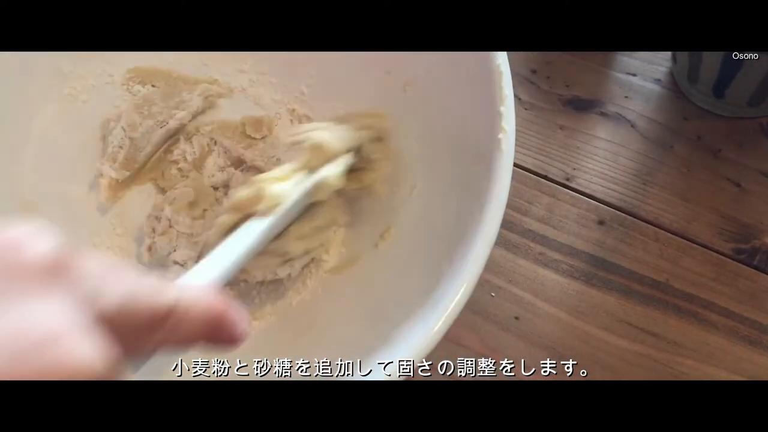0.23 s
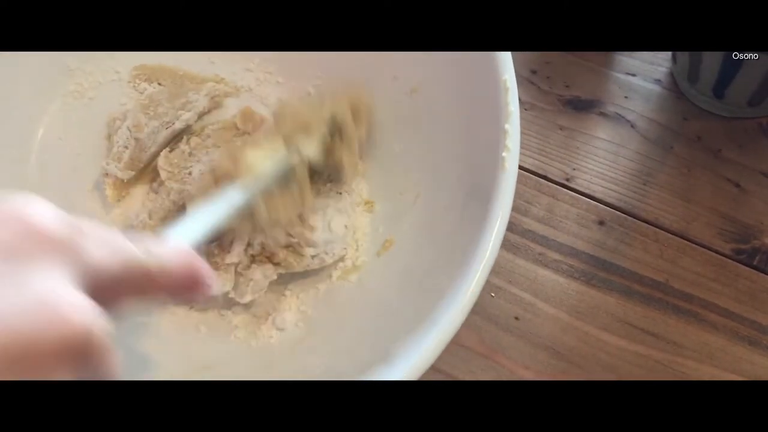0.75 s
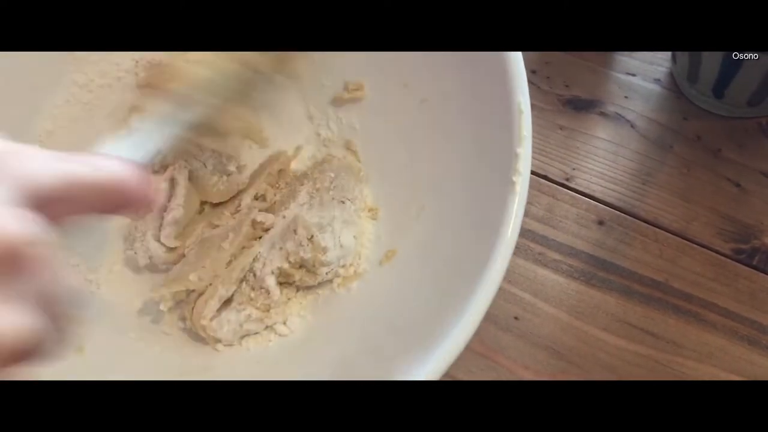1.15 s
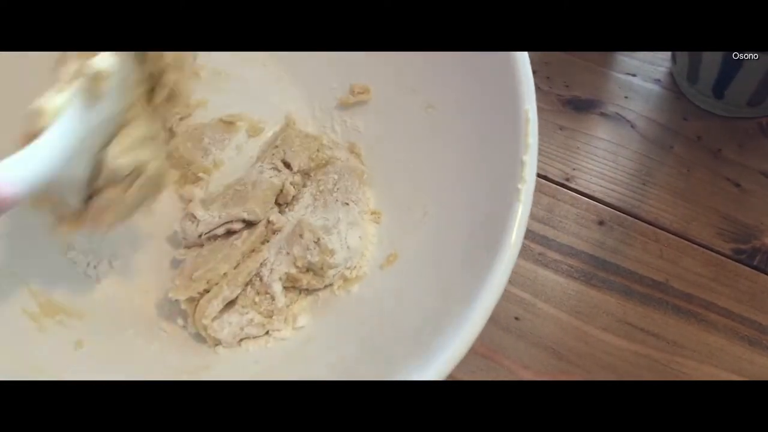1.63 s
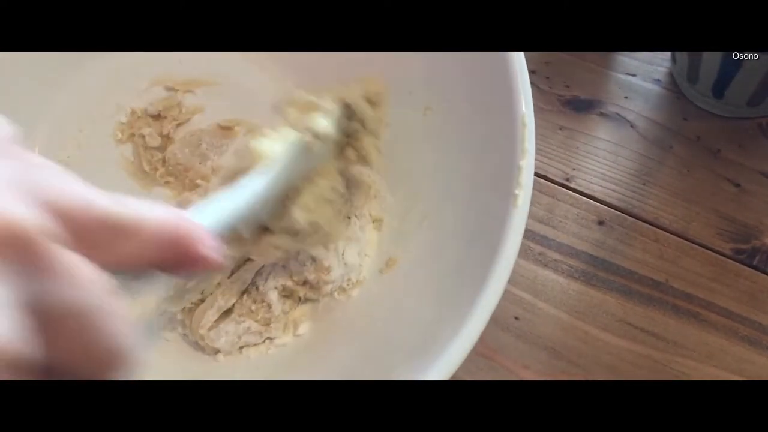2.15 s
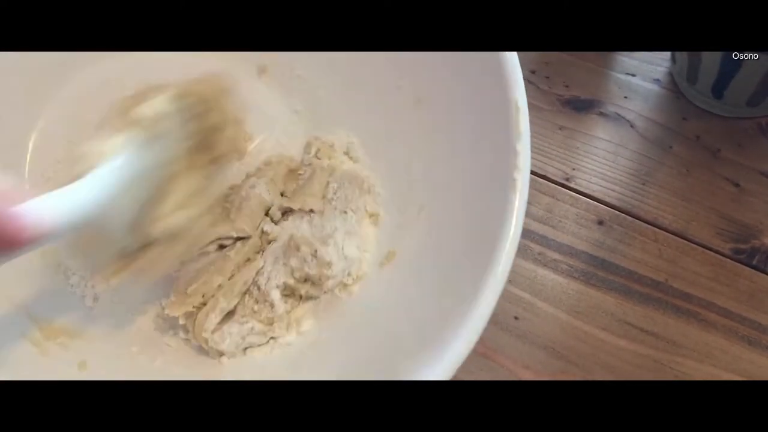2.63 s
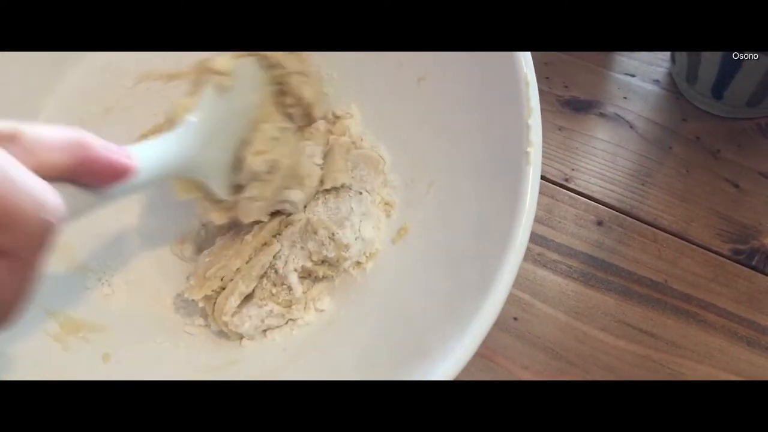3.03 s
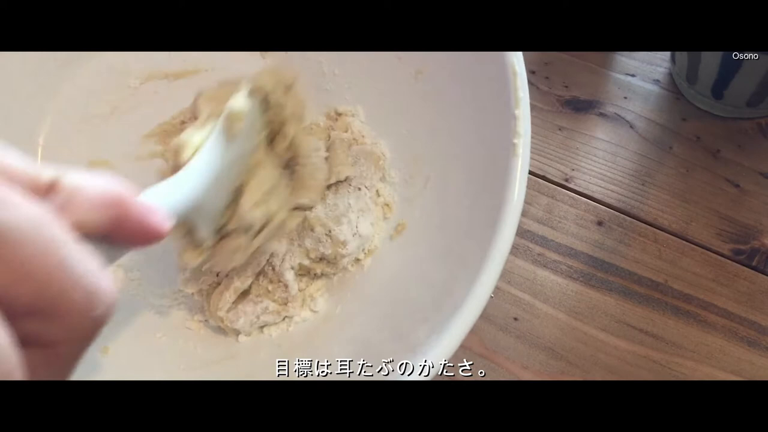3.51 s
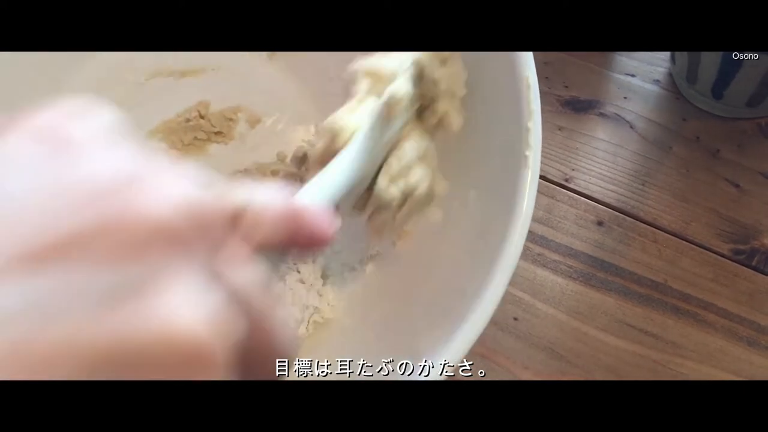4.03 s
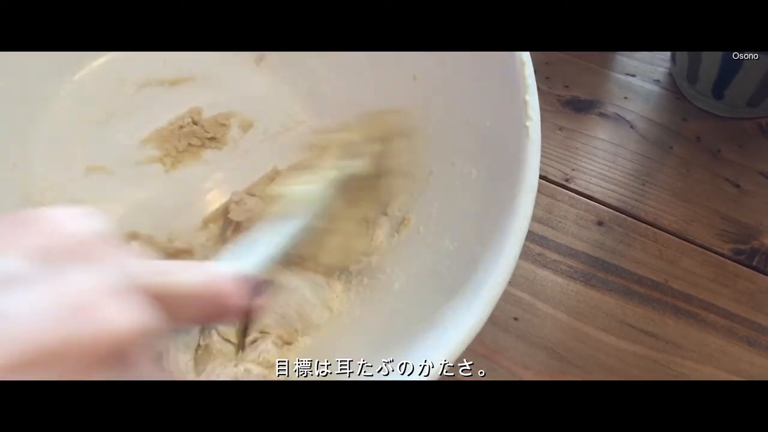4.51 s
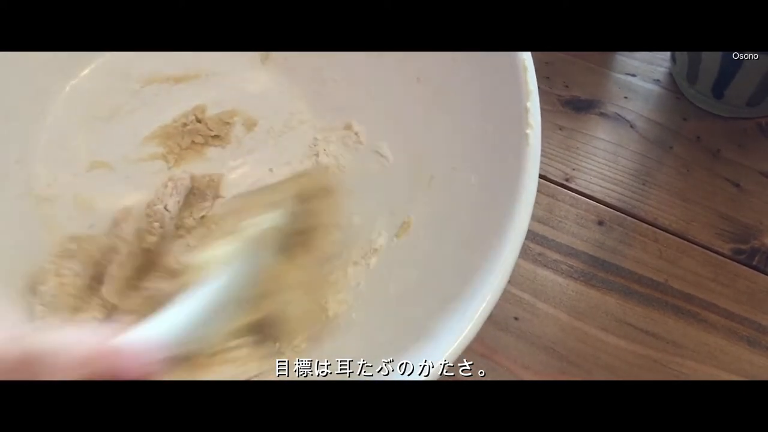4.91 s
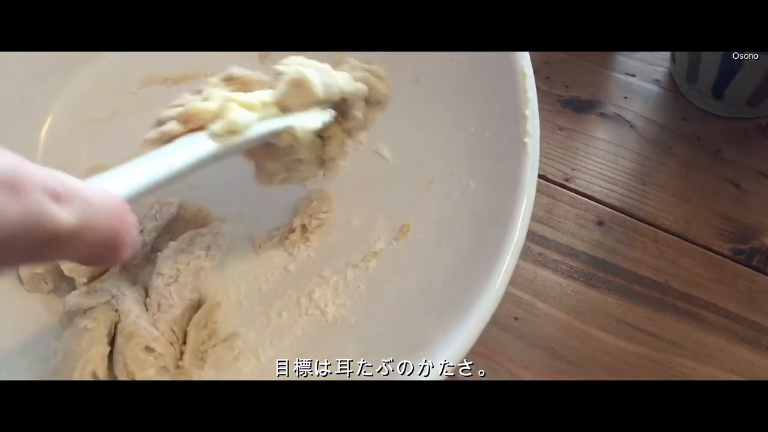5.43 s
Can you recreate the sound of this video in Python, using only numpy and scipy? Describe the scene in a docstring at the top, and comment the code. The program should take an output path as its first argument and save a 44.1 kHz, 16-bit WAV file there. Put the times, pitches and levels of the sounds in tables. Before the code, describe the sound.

Close to the microphone in a kitchen, stiff dough is pressed and smeared around a bowl with a silicone spatula. Soft scrapes and sticky smacks come in quick, irregular strokes, with low thuds as the bowl shifts on a wooden table. An air pocket snaps, the blade knocks the side several times and squeaks twice, the second time faintly. The strongest push comes late, followed by a hissing swipe and a small tap.

```python
"""In a kitchen, close by, a silicone spatula folds stiff dough in a bowl on a wooden table.
Sliding friction makes the blade hiss and rub hollowly on the wall; the sticky dough tears and squishes.
Each push rocks the bowl with a dull thud; knocks and chatter of the blade excite its damped modes.
Air pockets snap, the spatula ticks and taps, and twice stick-slip motion makes the blade squeak."""
import sys
import numpy as np
from scipy import signal
from scipy.fft import rfft, irfft, next_fast_len
from scipy.io import wavfile
from scipy.ndimage import map_coordinates

SR = 44100
rng = np.random.default_rng(int(sys.argv[2]) if len(sys.argv) > 2 else 0)


def put_to_file(sound):
    """Save the sound as 16-bit audio at rate SR, in the file named by the first command-line argument."""
    columns = np.atleast_2d(sound).T  # one column per channel
    safe = np.clip(columns, -1, 1)
    whole_steps = np.round(safe * 32767)
    wavfile.write(sys.argv[1], SR, whole_steps.astype(np.int16))


N = 249606

# Levels are relative within each table. Spectra: f/Hz, level/dB
ROOM_SPECTRUM = [(20, -27), (40, -6.5), (65, 1), (100, -7), (160, -7), (240, -9.5), (400, -18), (800, -21),
                 (1600, -24), (3000, -27.5), (8000, -32.5), (15500, -37.5)]
TABLE_SPECTRUM = [(20, -60), (40, -10), (60, -15), (88, 5), (120, -5), (155, 4), (250, -14.5), (400, -25.5),
                  (900, -52.5)]
SQUASH_SPECTRUM = [(100, 0.5), (180, -3), (290, 1), (400, -4), (520, -1.5), (700, -7.5), (1100, -24),
                   (2000, -21), (4000, -68)]
RUB_SPECTRUM = [(200, -6.5), (450, 2), (1100, 7), (1900, 1), (2600, -0.5), (4300, 5.5)]
SMEAR_SPECTRUM = [(500, -38), (1000, -20.5), (1700, -7.5), (2400, -0.5), (3300, -4), (4400, -1.5),
                  (4900, -12.5), (6500, -2.5), (10000, -44)]
HISS_SPECTRUM = [(2000, -29), (5000, -17), (6000, -15.5), (6500, -6), (7300, -2), (8900, -1.5), (10300, -9),
                 (11200, -7), (13000, -9), (15800, -10.5)]
# reverberation of the kitchen: f/Hz, T60/s
ROOM_DECAY = [(100, 0.48), (500, 0.2), (2000, 0.083), (10000, 0.11)]
# modes of the dough-damped bowl: f/Hz, level/dB, T60/s
BOWL_MODES = [(191, -1.5, 0.089), (252, -11, 0.055), (320, -13, 0.04), (469, -1, 0.046), (546, -5.5, 0.042),
              (634, -4, 0.039), (742, -15.5, 0.038), (1039, -16, 0.14), (1131, -14.5, 0.08),
              (1246, -11.5, 0.052), (1786, -16, 0.075), (1747, -3, 0.018), (1932, -3, 0.026),
              (1930, -5.5, 0.039), (2590, -7, 0.022), (2985, -12.5, 0.033), (3470, -18, 0.021),
              (4340, -18.5, 0.018)]
# pushes that rock the bowl: t/s, level/dB, f/Hz, loss per rebound/dB
BOWL_PUSHES = [(0.017, -31, 83.4, 3.5), (0.828, -43.5, 78.4, 22), (1.186, -37, 83, 20),
               (1.211, -40, 76.6, 3), (1.441, -42.5, 91.5, 20), (1.522, -40, 66.5, 4.5),
               (1.905, -40, 69, 10), (1.948, -47, 130, 16), (2.006, -45, 60.7, 21), (2.082, -44, 69, 21),
               (2.222, -46, 61, 20), (2.266, -47.5, 71.6, 20), (2.402, -30.5, 79.6, 3),
               (2.593, -36.5, 66, 25), (2.804, -40.5, 62, 21), (2.844, -40, 126, 20),
               (2.902, -43.5, 94, 1.5), (3.338, -37.5, 69, 23), (3.406, -37.5, 68, 16),
               (3.438, -36.5, 72, 15), (3.719, -40, 67.4, 5.5), (3.824, -42, 76.6, 19),
               (4.187, -42, 99, 25), (4.206, -36, 88, 6.5), (4.545, -41.5, 68.4, 18),
               (4.602, -23.5, 92, 8.5), (4.705, -35, 78.6, 8.5), (4.909, -38.5, 83, 6),
               (5.037, -46, 85, 16), (5.237, -47, 84.5, 15), (5.487, -51, 85, 20)]
# the lump is squashed between blade and wall: t/s, level/dB, T60/s
DOUGH_SQUASHES = [(0, -64, .5), (1.18, -62, 0.7), (1.54, -66.5, 0.54), (2.578, -55, 0.1), (2.99, -62, .35),
                  (4.178, -59, 0.26), (4.535, -61.5, .5), (4.6, -62.5, .3), (4.705, -64, 0.18),
                  (4.94, -57, 0.45)]
# wet squishes and hollow rubs on the bowl: t/s, level/dB, half length/s, f/Hz, half width/octaves
SQUISHES_AND_RUBS = [(0.863, -62.5, 0.0051, 2890, 1), (0.981, -67.5, 0.02, 3370, 0.13),
                     (1.038, -67.5, .014, 2580, .15), (1.217, -70, 0.012, 2010, 0.17),
                     (1.596, -69, 0.0083, 1990, 0.087), (1.179, -59.5, 0.0058, 7550, 0.32),
                     (1.794, -63.5, 0.0061, 7850, 0.38), (1.863, -61, 0.017, 7100, 0.12),
                     (1.913, -52.5, 0.015, 7130, 0.045), (1.976, -57.5, 0.012, 7460, 0.26),
                     (2.099, -58, 0.028, 1600, 0.6), (2.447, -57.5, 0.0053, 7440, 0.059),
                     (2.523, -67, 0.031, 1940, 0.07), (2.598, -64, 0.024, 7000, 0.077),
                     (2.869, -60.5, 0.0027, 6200, .07), (3.33, -65.5, 0.0083, 7600, 0.06),
                     (3.387, -61.5, 0.004, 6740, 0.24), (3.484, -64.5, 0.023, 2010, 0.054),
                     (2.942, -64.5, 0.041, 1870, 0.07), (4.154, -57, 0.004, 7460, 0.31),
                     (4.173, -57, 0.012, 7040, 0.44), (4.272, -70, 0.034, 2740, 0.14),
                     (4.545, -66, 0.013, 6940, 0.13), (4.692, -63.5, 0.025, 3070, 0.05),
                     (5.009, -57.5, 0.036, 3050, 0.3)]
# air pockets snap, the spatula ticks and once taps with three ringing tones:
# t/s, level/dB, f/Hz, cycles per 20 dB of decay
POPS_AND_TAPS = [(1.545, -51, 1870, 7.2), (2.1099, -24.5, 1720, 2.1), (3.567, -43, 2380, 3.6),
                 (4.912, -44, 1180, 0.86), (5.22, -47, 2040, 10.4), (5.2223, -47, 2900, 9.8),
                 (5.222, -45.5, 1320, 2)]
# the blade sticks and slips, one list a squeak: t/s, f/Hz, level/dB
SQUEAK_PATHS = [
    [(3.50, 518.6, -77), (3.522, 547, -54), (3.533, 658, -45.5), (3.537, 555, -61), (3.541, 486, -36),
     (3.55, 509, -46.5), (3.567, 512, -50.5), (3.595, 500, -56), (3.63, 505, -81)],
    [(4.32, 595, -78), (4.333, 558, -59), (4.353, 506, -61.5), (4.375, 505, -78)],
]
# the blade strikes the wall: t/s, level/dB, tilt/(dB per octave), contacts, gap/s
BLADE_KNOCKS = [(1.168, -58.5, 1, 1, 0), (1.857, -49.5, 2, 4, 0.012), (2.383, -29, -1.7, 1, 0),
                (2.4444, -44, 5, 2, 0.0059), (2.8399, -31.5, -7.5, 1, 0), (2.8557, -42, 1, 4, .0056),
                (2.942, -57, -4, 1, 0), (3.123, -56.5, -1, 1, 0), (3.314, -35, -6.5, 1, 0),
                (3.328, -50.5, 4, 2, .006), (4.514, -57.5, 0.5, 1, 0), (4.586, -49.5, -0.5, 1, 0),
                (4.891, -54, 1, 1, 0.005)]
# the bare blade drags on the wall: t/s, half length/s, level/dB
BLADE_DRAGS = [(1.1, 0.27, -72.5), (1.575, 0.049, -65.5), (1.885, 0.036, -64), (2.455, 0.039, -55.5),
               (2.56, 0.037, -60.5), (2.877, 0.012, -52.5), (2.97, 0.061, -62), (3.18, 0.037, -72),
               (3.342, 0.038, -61.5), (3.515, 0.039, -62)]
# swells of blade speed: t/s, half length/s, hiss level/dB, smear level/dB
BLADE_STROKES = [(0.01, 0.016, -69.5, -69.5), (0.169, .026, -71, -73), (0.424, .07, -78.5, -77),
                 (0.558, 0.027, -71, -71), (0.642, 0.012, -61, -73), (0.842, 0.077, -71.5, -71),
                 (0.966, 0.016, -60, -62), (1.042, .024, -64.5, -64), (1.21, 0.056, -69.5, -71.5),
                 (1.331, 0.022, -61.5, -68.5), (1.5, 0.027, -71, -70.5), (1.578, 0.01, -63.5, -74),
                 (1.873, 0.03, -64, -64), (1.917, 0.028, -57, -63.5), (2.013, 0.044, -67, -73),
                 (2.095, 0.025, -50.5, -55), (2.518, 0.039, -64, -68), (2.595, 0.035, -67.5, -69.5),
                 (2.885, 0.032, -69, -70), (3.005, 0.047, -68.5, -71), (3.172, 0.016, -76.5, -71.5),
                 (3.392, 0.019, -75, -73), (3.499, 0.021, -60.5, -77), (3.848, 0.042, -58, -66),
                 (3.952, 0.022, -61, -69), (4.173, 0.014, -57.5, -69), (4.298, 0.031, -60, -63.5),
                 (4.558, 0.025, -62.5, -69.5), (4.685, 0.024, -63, -63.5), (4.725, 0.023, -55.5, -63.5),
                 (5.022, 0.035, -47, -62), (5.223, 0.024, -66, -75.5), (5.306, 0.039, -71, -79)]


def amp(db):
    """Decibels to gain."""
    return 10 ** (np.asarray(db) / 20)


def unit(x):
    """Scaled to rms 1."""
    return x / np.sqrt(np.mean(x ** 2) + 1e-20)


def along(points, hz):
    """(f/Hz, value) points interpolated on a log axis."""
    f, v = np.transpose(points)
    return np.interp(np.log(hz + 1), np.log(f), v)


def curves(rows):
    """One value per sample for each column after the time."""
    s, *cols = np.transpose(rows)
    return [np.interp(np.arange(N) / SR, s, c) for c in cols]


def wobble(rate):
    """A smooth random curve, rate knots a second."""
    return map_coordinates(rng.standard_normal(int(N * rate / SR) + 4), [np.arange(N) * rate / SR])


def filtered(x, response):
    """Linear filtering: the spectrum of x times a frequency response."""
    m = next_fast_len(len(x) + 8192)
    return irfft(rfft(x, m) * response(np.fft.rfftfreq(m, 1 / SR)), m)[:len(x)]


def band(x, centre_hz, octaves, order):
    """Band-pass filtering, symmetric in log frequency; rms 1."""
    return unit(filtered(x, lambda hz: 1 / (1 + (np.log2((hz + 1) / centre_hz) / octaves) ** order)))


def add(track, s, sound):
    """Superpose a sound on the track from time s on."""
    start = round(s * SR)
    part = sound[max(-start, 0):max(N - start, 0)]
    track[max(start, 0):][:len(part)] += part


def swells(events, idle_db, shape=1.53, lean=0.071):
    """Gain of bell-shaped gestures, quicker to rise than to fall, adding in power over a floor."""
    t, power = np.arange(0, N, 32) / SR, 0
    for s, half, db in events:
        width = half * (1 + lean * np.sign(t - s))
        power += amp(db) ** 2 * np.exp(-np.abs((t - s) / width) ** shape)
    return np.interp(np.arange(N) / SR, t, np.sqrt(power + amp(idle_db) ** 2))


def surges(events, rise_s):
    """Gain of efforts with Gaussian rise and exponential decay, adding in power."""
    t, power = np.arange(0, N, 32) / SR, 0
    for s, db, t60 in events:
        rise = np.exp(-(np.minimum(t - s, 0) / rise_s) ** 2)
        power += rise * amp(db - 60 * np.maximum(t - s, 0) / t60) ** 2
    return np.interp(np.arange(N) / SR, t, np.sqrt(power))


def noise(spectrum):
    """Gaussian noise of a given spectrum, rms 1."""
    return unit(filtered(rng.standard_normal(N), lambda hz: amp(along(spectrum, hz))))


def friction(spectrum, rate, grain_db):
    """Friction as shot noise: countless tiny slips and rate larger ones a second; rms 1."""
    slips = (rng.random(N) < rate / SR) * rng.standard_normal(N)
    force = rng.standard_normal(N) + amp(grain_db) * unit(slips)
    return unit(filtered(force, lambda hz: amp(along(spectrum, hz))))


def reverberation(x):
    """The diffuse field of the kitchen decays exponentially, each frequency at its own rate."""
    hz, t, spectra = signal.stft(rng.standard_normal(SR // 2), SR, nperseg=256)
    decay = amp(-60 * t / along(ROOM_DECAY, hz)[:, None])
    tail = signal.istft(spectra * decay, SR, nperseg=256)[1]
    delayed = np.pad(tail / np.linalg.norm(tail), (SR // 200, 0))
    return signal.fftconvolve(x, delayed)[:N]


def table_rumble(t60=0.62):
    """Damped vibration of the table top follows each push."""
    shake = surges([(s, db, t60) for s, db, _, _ in BOWL_PUSHES], rise_s=0.017)
    return shake * noise(TABLE_SPECTRUM)


def squashing(idle_db=-86.5):
    """Compression of the lump between blade and wall gives a dull friction noise."""
    squeeze = np.hypot(surges(DOUGH_SQUASHES, rise_s=0.0096), amp(idle_db))
    return squeeze * amp(0.88 * wobble(40)) * friction(SQUASH_SPECTRUM, rate=110, grain_db=-6.5)


def squishes_and_rubs(grain_db=-3):
    """Narrow-band noise in swells: wet squishes and the hollow rub of the blade on the bowl."""
    track, t = np.zeros(N), np.arange(-SR // 8, SR // 8) / SR
    for s, db, half, hz, octaves in SQUISHES_AND_RUBS:
        grainy = rng.standard_normal(len(t)) + amp(grain_db) * unit(rng.standard_normal(len(t)) ** 3)
        envelope = amp(db) * np.exp(-.5 * (t / half) ** 2)
        add(track, s + t[0], envelope * band(grainy, hz, octaves, order=2))
    return track


def smacks(smear, rub, rate=70, pitch_hz=2000, spread=0.29, cycles=4):
    """Tiny air pockets pop at random as damped oscillators, louder where the blade works harder."""
    effort = np.hypot(rub, amp(5) * smear)
    when, pitch, strength = rng.random((int(rate * N / SR), 3)).T[:, :, None]
    t = np.arange(SR // 100) / SR
    start = (when * (N - len(t))).astype(int)
    hz = pitch_hz * np.exp(spread * (4 * pitch - 2))
    gain = effort[start] * amp(6 + 3.9 * strength ** 2)
    envelope = amp(-20 * t * hz / cycles) * (1 - np.exp(-t * hz))
    pops = gain * envelope * np.sin(2 * np.pi * hz * t)
    return np.bincount((start + np.arange(len(t))).ravel(), pops.ravel(), N)


def pops_and_taps(echo_db=-22, echo_t60=0.041):
    """Damped oscillation: air snaps and spatula ticks and taps ring briefly, then echo in the bowl."""
    track, t = np.zeros(N), np.arange(SR // 16) / SR
    for s, db, hz, cycles in POPS_AND_TAPS:
        ring = np.sin(2 * np.pi * hz * t) * amp(-20 * t * hz / cycles)
        echo = band(rng.standard_normal(len(t)), hz, octaves=.7, order=4)
        echo *= amp(echo_db - 60 * t / echo_t60)
        onset = 1 - np.exp(-3 * t * hz / cycles)
        add(track, s, amp(db + 6) * (ring + echo) * onset)
    return track


def squeaks(overtone_db=-20, jitter=.008):
    """Stick-slip oscillation: the rubber chirps, then settles on a low note of the bowl."""
    track, t = np.zeros(N), np.arange(N) / SR
    for path in SQUEAK_PATHS:
        hz, db = curves(path)
        phase = 2 * np.pi * np.cumsum(hz * (1 + jitter * wobble(200))) / SR
        tone = np.sin(phase) + amp(overtone_db) * np.sin(2 * phase)
        sounding = (t > path[0][0]) & (t < path[-1][0])
        track += sounding * amp(db + 0.9 * wobble(150)) * tone
    return track


def thuds(cycles=0.63, lopsided=0.084, rebound_s=.048, settle_db=0.5):
    """Inelastic rebound: the pushed bowl swings unevenly, tips back and lands ever more weakly."""
    track, t = np.zeros(N), np.arange(-SR // 20, SR // 20) / SR
    for s, db, hz, loss_db in BOWL_PUSHES:
        envelope = np.exp(-.5 * (t * hz / cycles) ** 2)
        for k in range(4):
            phase = 2 * np.pi * hz * t + rng.normal(0, 0.51)
            swing = lopsided * np.cos(2 * phase) - np.cos(phase)
            gain = amp(db - k * loss_db - settle_db * k * (k + 2.5))
            add(track, s + k * rebound_s + t[0], gain * envelope * swing)
    return track


def knocks(crack_db=7.5, crack_t60=0.013, crack_hz=1800, thump_hz=149, thump_t60=.06, attack_s=0.00056):
    """Impact excitation: each contact rings the modes at new strengths and shoves the whole bowl."""
    track, t = np.zeros(N), np.arange(SR // 4) / SR
    hz, level, t60 = np.transpose(BOWL_MODES)[:, :, None]
    thump = amp(1 - 60 * t / thump_t60) * np.sin(2 * np.pi * thump_hz * t)
    onset = 1 - np.exp(-t / attack_s)
    for s, db, db_per_octave, contacts, gap in BLADE_KNOCKS:
        tilt = lambda f: amp(db_per_octave * np.log2(np.maximum(f, 500) / 500))  # harder is brighter
        for k in range(round(contacts)):
            gains = amp(level + 2 * rng.standard_normal(hz.shape)) * tilt(hz)
            signs = rng.choice([-1, 1], hz.shape)
            ring = np.sum(signs * gains * amp(-60 * t / t60) * np.sin(2 * np.pi * hz * t), 0)
            crack = filtered(rng.standard_normal(len(t)), lambda f: tilt(f) / (1 + (f / crack_hz) ** 2))
            crack *= amp(crack_db - 60 * t / crack_t60)
            add(track, s + k * gap, amp(db - 4) * (ring + thump + crack) * onset)
    return track


def bowl_response(hz):
    """Resonance: the modes add in power, each with a bandwidth set by its damping."""
    power = 0
    for centre, db, t60 in BOWL_MODES:
        bandwidth = np.log(1000) / np.pi / t60
        power += amp(db) ** 2 / ((hz - centre) ** 2 + (bandwidth / 2) ** 2)
    return np.sqrt(power)


def judder(rub):
    """Forced vibration: uneven friction on the wall drives the modes of the bowl."""
    pressure = rub * amp(4.4 * wobble(60))
    force = friction(RUB_SPECTRUM, rate=180, grain_db=-0.5)
    return pressure * unit(filtered(force, bowl_response))


def hollow(x, t60, echo_db, drift, patterns=7):
    """Interference of echoes in the bowl combs x into peaks that shift as the blade travels."""
    t = np.arange(SR // 20) / SR
    weights = np.exp([2 * wobble(drift) for _ in range(patterns)])
    weights /= np.linalg.norm(weights, axis=0)
    responses = rng.standard_normal((patterns, len(t))) * amp(-60 * t / t60)
    responses /= np.linalg.norm(responses, axis=1, keepdims=True)
    echoes = signal.oaconvolve(x[None], responses, axes=1)[:, :N]
    return unit(x + amp(echo_db) * np.sum(weights * echoes, 0))


def scraping(slide, smear):
    """Sliding friction: the blade hisses, and the sticky dough tears behind it in coarser grains."""
    hiss_gain = slide * amp(2.0 * wobble(45))
    slips = friction(HISS_SPECTRUM, rate=1200, grain_db=-4.5)
    hiss = hiss_gain * hollow(slips, t60=0.029, echo_db=-1, drift=9)
    tear_gain = smear * amp(2.9 * wobble(70))
    tears = friction(SMEAR_SPECTRUM, rate=400, grain_db=-11)
    return hiss + tear_gain * hollow(tears, t60=0.024, echo_db=-0.5, drift=14)


def gestures(stroke_rub_db=-13):
    """Amplitude envelopes of sliding, smearing and rubbing; the blade never quite stops."""
    slide = swells([(s, half, db) for s, half, db, _ in BLADE_STROKES], idle_db=-87)
    smear = swells([(s, half, db) for s, half, _, db in BLADE_STROKES], idle_db=-86)
    rub = np.hypot(swells(BLADE_DRAGS, idle_db=-84), amp(stroke_rub_db) * smear)
    return slide, smear, rub


def scene():
    """Superposition of spatula, dough and bowl on the reverberation and faint noise of the room."""
    slide, smear, rub = gestures()
    contacts = knocks() + pops_and_taps() + smacks(smear, rub) + squeaks() + squishes_and_rubs()
    rocking = thuds()
    room = reverberation(amp(-12.5) * contacts + amp(-11) * rocking)
    blade = amp(0.6) * scraping(slide, smear) + amp(-2) * judder(rub)
    pressing = amp(1) * squashing() + amp(-23) * table_rumble()
    background = amp(-65.5) * noise(ROOM_SPECTRUM)
    return (background + room + pressing + rocking + contacts + blade)[None]


def record(dry, top_hz=15830):
    """Band limiting: an ideal low-pass filter passes nothing above top_hz."""
    return filtered(dry[0], lambda hz: hz < top_hz)[None]


dry = scene()
out = record(dry)
put_to_file(out)
```